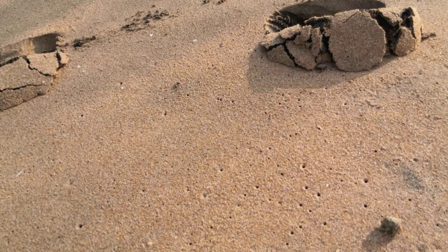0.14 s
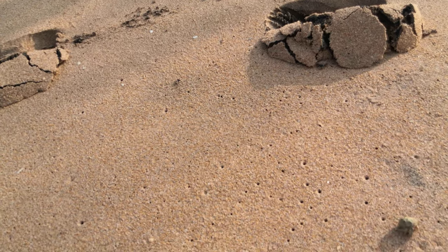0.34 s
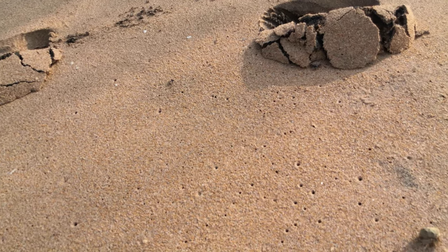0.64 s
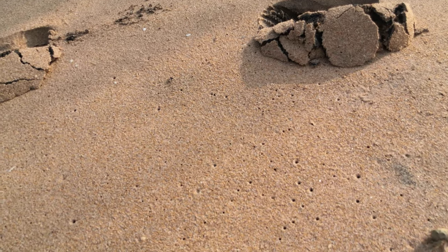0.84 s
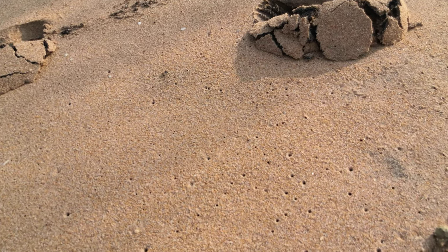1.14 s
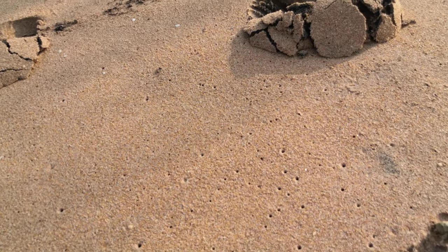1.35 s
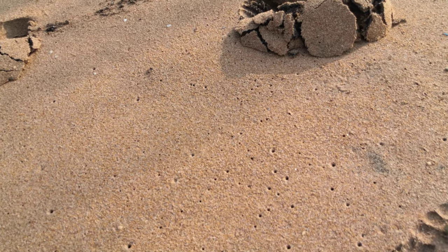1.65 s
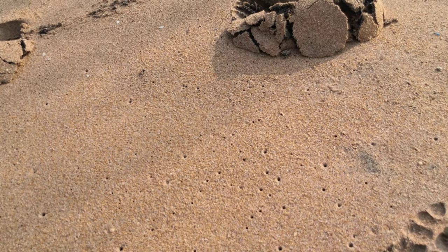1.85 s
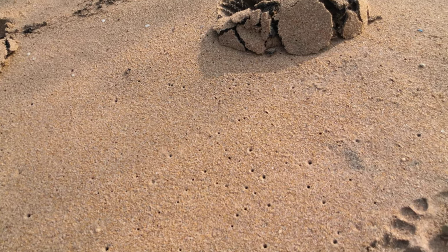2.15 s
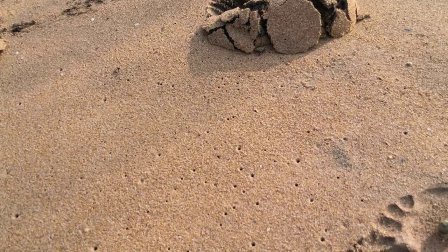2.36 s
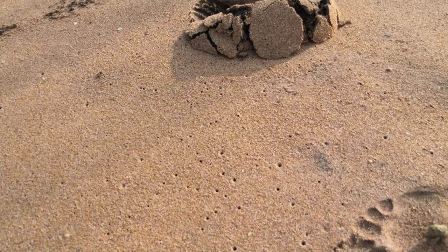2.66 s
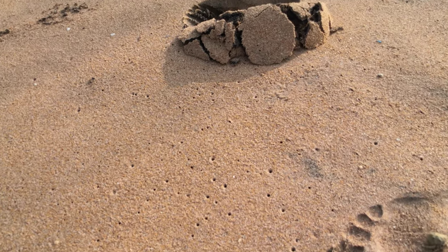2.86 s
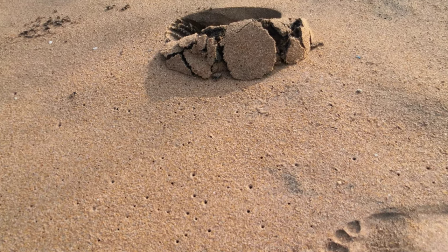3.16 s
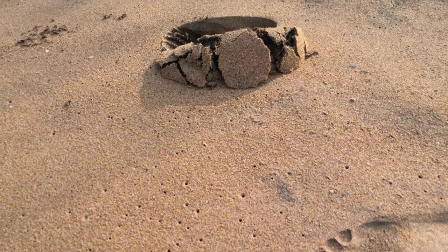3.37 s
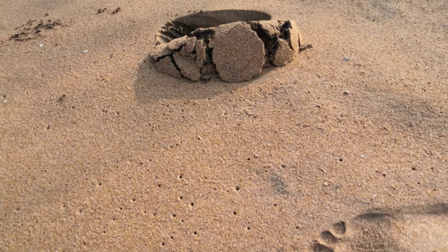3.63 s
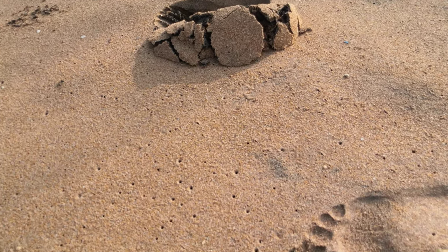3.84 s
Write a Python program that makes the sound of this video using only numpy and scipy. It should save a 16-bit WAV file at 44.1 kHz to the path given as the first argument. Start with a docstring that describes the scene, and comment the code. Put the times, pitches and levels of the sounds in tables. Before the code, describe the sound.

Sea waves wash steadily up a sandy beach, foam hissing over a low roar and wind rumble.

```python
"""Surf on a sandy beach, heard through the two microphone ports of a hand-held phone.
After a short silence the sound cuts in: far breakers roar over wind rumble, both shaped from noise bands,
and foam hisses and fizzes as a wave runs up the sand, from noise with thousands of short bubble rings.
Two small crests slap over near the start, and four more from 2.9 s on, as brief gains on the same bands.
"""
import sys
import numpy as np
from scipy import signal
from scipy.fft import rfft, irfft
from scipy.io import wavfile
from scipy.ndimage import uniform_filter1d

SR = 44100
rng = np.random.default_rng(int(sys.argv[2]) if len(sys.argv) > 2 else 0)


def store_wav(level_fs):
    """Save 16-bit WAV to argv[1]."""
    pcm = np.round(np.clip(np.atleast_2d(level_fs), -1, 1) * 32767)
    wavfile.write(sys.argv[1], SR, pcm.T.astype(np.int16))


N = 176400
T = np.arange(N) / SR  # seconds
HZ = np.fft.rfftfreq(N, 1 / SR) + 1e-3  # kept above zero for the logarithms
SPLIT_HZ = 577  # roar below, foam above
TILT_PIVOT_HZ = 2500  # brightening leaves the level here unchanged


def undb(db):
    """Decibel law: a level in dB becomes an amplitude gain."""
    return 10 ** (np.asarray(db) / 20)


def over_hz(table):
    """Logarithmic pitch scale: a table of frequency and value is interpolated by octaves."""
    table = np.array(table)
    return np.interp(np.log(HZ), np.log(table[:, 0]), table[:, 1])


def over_time(table, axis):
    """Piecewise-linear envelope: one column of a table is interpolated along time."""
    table = np.array(table)
    return np.interp(T, table[:, 0], table[:, axis])


def walk(rate):
    """Band-limited fluctuation: random levels, `rate` a second, smoothed twice to a spread near 1."""
    hold = int(SR / rate)
    steps = np.repeat(rng.standard_normal(N // hold + 1), hold)
    smooth = uniform_filter1d(uniform_filter1d(steps, hold), hold)
    return 1.3 * smooth[:N]


def rms(x):
    """Mean-square principle: the effective level of the centre of the stereo picture."""
    return np.sqrt(np.mean(x.mean(axis=0) ** 2))


BUBBLE_COUNT = 6000  # spread over the whole duration
BUBBLE_LOW_HZ, BUBBLE_HIGH_HZ = 899.4, 9930
BUBBLE_DB = -9  # level of all bubbles relative to the noise of the rush
BUBBLE_SCATTER_DB = 1.5  # mean excess of single bubbles over the weakest at their pitch
BUBBLE_CYCLES, BUBBLE_GLIDE = 14, .05  # cycles per unit of age, relative rise in pitch per unit of age


def bubbles():
    """Bubble resonance: foam bubbles burst at random times, each a short damped ring rising in pitch."""
    when, pitch, size = rng.random((BUBBLE_COUNT, 3)).T[:, :, None]
    hz = BUBBLE_LOW_HZ * (BUBBLE_HIGH_HZ / BUBBLE_LOW_HZ) ** pitch
    k = np.arange(1024)  # samples of one ring
    age = hz * k / SR / BUBBLE_CYCLES
    phase = 2 * np.pi * BUBBLE_CYCLES * age * (1 + BUBBLE_GLIDE * age / 2)
    ring = np.sin(phase) * age * np.exp(-2 * age)
    # higher bubbles ring louder; levels scatter exponentially in dB
    ring = ring * hz * undb(-BUBBLE_SCATTER_DB * np.log(1 - size))
    places = (when * N).astype(int) + k
    out = np.bincount(places.ravel() % N, ring.ravel(), N)
    return out / out.std() * undb(BUBBLE_DB)


# Colour of the sea through the phone. Each row: frequency in Hz, relative spectral density in dB per Hz.
SEA_COLOUR = [(15, -46), (25, -18.5), (64, -6), (118, -1.5), (172, 0.5), (271, -2), (404, -4.5),
              (588, -11.5), (900, -15), (1090, -18.5), (1350, -20), (1700, -15.5), (2200, -14), (2700, -17),
              (3260, -23), (3800, -24.5), (5720, -27), (6200, -29), (7280, -28), (7900, -27.5), (8400, -32),
              (8800, -31.5), (9500, -39.5), (10300, -45.5), (15000, -54)]
# Coherence of the two ports. Each row: frequency in Hz, likeness from 0 to 1.
PORT_LIKENESS = [(60, .995), (200, .96), (300, .86), (500, .58), (700, .42), (900, .18), (1100, .4),
                 (1700, .12), (2400, .4), (3000, .2), (4600, .3), (5500, .15), (6300, .3), (15000, .22)]
# Phase between the ports. Each row: frequency in Hz, lead of the left port in radians.
LEFT_LEAD = [(20, .02), (100, .2), (200, .5), (300, .9), (500, 1.9), (700, 3.1), (1250, 3.3), (1600, 6.3),
             (2000, 9.4), (2800, 9.8), (3600, 12.3), (5000, 14.3), (6000, 9.6), (7000, 13), (8000, 15.7),
             (9000, 18.6), (15000, 21)]
# Level difference of the ports. Each row: frequency in Hz, left minus right in dB.
LEFT_RIGHT_BALANCE = [(60, -0.5), (200, 0), (380, 1), (650, 6), (950, 3.5), (1400, 3.5), (2360, 3),
                      (4350, 2), (6200, 3.5), (8300, 3), (10000, -1.5), (15000, 0.5)]


def ports(a, b):
    """Partial coherence: two unrelated signals mix into left and right spectra, with phase lead and balance."""
    like = np.clip(over_hz(PORT_LIKENESS), 0, 1)
    same = np.sqrt((1 + like) / 2) * rfft(a)
    other = np.sqrt((1 - like) / 2) * rfft(b)
    # half of the lead and half of the balance go to each side
    turn = np.exp(.5j * over_hz(LEFT_LEAD))
    tilt = undb(over_hz(LEFT_RIGHT_BALANCE) / 2)
    left = (same + other) * turn * tilt
    right = (same - other) / turn / tilt
    return np.array([left, right]) * undb(over_hz(SEA_COLOUR))


def rushing_water():
    """Turbulent noise: white noise with bubbles, drawn twice and passed to the two ports as spectra."""
    first = rng.standard_normal(N) + bubbles()
    second = rng.standard_normal(N) + bubbles()
    return ports(first, second)


# Far breakers and wind. Each row: time in seconds, base roar level in dB, extra wind rumble in the bass in dB.
ROAR_COURSE = [(.37, -37, 2), (.6, -34, 0.5), (1.2, -33, -5.5), (1.8, -34, -4), (2.2, -35.5, -3),
               (2.6, -35, -1.5), (3.0, -33.5, -0.5), (3.36, -33, 4), (3.6, -33.5, -6), (4, -37.5, 12)]


def roar_levels(water):
    """Level normalisation: gain in dB that brings the low water to the roar course, and the extra rumble."""
    low_water = irfft(water * (HZ < SPLIT_HZ), N)
    gain_db = over_time(ROAR_COURSE, axis=1) - 20 * np.log10(rms(low_water))
    return gain_db, over_time(ROAR_COURSE, axis=2)


WIND_HZ, RUMBLE_DB = 99, 1.5  # where the rumble's dB gain is halved, random wander of the wind


def wind_rumble(extra_db, hz):
    """Low-frequency weighting: wind raises and wanders the bass, with an effect that fades up the scale."""
    return (extra_db + RUMBLE_DB * walk(7.5)) / (1 + (hz / WIND_HZ) ** 2)


# Foam on the sand. Each row: time in seconds, base foam level in dB, brightening in dB per octave.
FOAM_COURSE = [(.37, -43, -.5), (.45, -44, 0), (.6, -42.5, -1), (.8, -41.5, 0.2), (1, -40.5, 0),
               (1.2, -40.5, -.2), (1.32, -40, -0.8), (1.53, -40, 0.5), (1.7, -40, -0.3), (1.9, -40.5, 0.2),
               (2.15, -40, 0), (2.27, -39.5, 0.5), (2.36, -40, 0.5), (2.55, -38.5, -0.5),
               (2.68, -39.5, 0.2), (2.8, -39, 0.1), (3.2, -39, 0.75), (3.3, -39, 0.5), (3.5, -40, 0.5),
               (3.62, -39.5, 0.5), (3.78, -41, 0), (4, -38, 0.5)]


def foam_levels(water):
    """Level normalisation: gain in dB that brings the high water to the foam course, and its spectral tilt."""
    high_water = irfft(water * (HZ > SPLIT_HZ), N)
    gain_db = over_time(FOAM_COURSE, axis=1) - 20 * np.log10(rms(high_water))
    return gain_db, over_time(FOAM_COURSE, axis=2)


HISS_HZ, HISS_OCTAVES = 4900, .45  # centre, distance at which the change in dB falls to 1/e
# The hiss dulls and clears. Each row: time in seconds, change at the centre frequency in dB.
HISS_COURSE = [(.37, -2.5), (.55, 1), (1, -0.5), (1.5, 1), (2.05, 0), (2.18, -1.5), (2.28, -3), (2.36, -1),
               (2.7, 1.5), (3.2, .5), (3.75, -1), (4, -2.5)]


def hiss_change(hz):
    """Bell-shaped equalisation: the change of the hiss in dB is greatest near 5 kHz."""
    return over_time(HISS_COURSE, axis=1) * np.exp(-(np.log2(hz / HISS_HZ) / HISS_OCTAVES) ** 2)


SLAP_ATTACK_S, SLAP_RELEASE_S = .035, .04  # time constants of the amplitude
# Small crests slapping over. Each row: start of the hold in seconds, level in dB over the water before
# colouring, hold in seconds, pan left minus right in dB, brightening in dB per octave.
CRESTS = [(0.35, -2, 0.02, 3, 2.5), (0.54, -6, .03, 3, 4), (2.887, -0.5, 0.06, -0.5, 1),
          (3.01, -6, 0.06, -5, 3.5), (3.357, 0.5, 0.036, -0.5, 0.5), (3.914, -1, 0.039, 2, 2)]


def slaps():
    """Power addition: relative power of each crest in each channel, with exponential rise, hold and fall."""
    out = []
    for start, db, hold, pan_db, _ in CRESTS:
        rise = np.minimum((T - start) / SLAP_ATTACK_S, 0)
        fall = np.maximum(T - start - hold, 0) / SLAP_RELEASE_S
        channel_gain = undb(db + pan_db * np.array([[.5], [-.5]]))
        out.append((np.exp(rise - fall) * channel_gain) ** 2)
    return np.array(out)


# Colour of a crest relative to the sea. Each row: frequency in Hz, relative level in dB.
CREST_COLOUR = [(100, -5), (400, -5.5), (900, 4.5), (2200, -0.5), (4500, -2.5), (8000, -1), (12000, -4)]


def slap_gain(crests, hz):
    """Incoherent summation: crest powers, coloured and tilted for one band, add to the water's own power."""
    colour_hz, colour_db = np.array(CREST_COLOUR).T
    tilt_db = np.array(CRESTS)[:, -1] * np.log2(hz / TILT_PIVOT_HZ)
    crest_db = np.interp(np.log2(hz), np.log2(colour_hz), colour_db) + tilt_db
    return np.sqrt(1 + np.tensordot(undb(crest_db) ** 2, crests, axes=1))


SHARED_DB, FLICKER_DB = .1, .6  # wander common to neighbouring bands, flicker of each band alone


def sea():
    """Subband synthesis: half-octave bands of water follow roar or foam, wander together and flicker alone."""
    water = rushing_water()
    roar_db, rumble_db = roar_levels(water)
    foam_db, brightening = foam_levels(water)
    crests = slaps()
    shared = walk(6)
    out = 0
    for octave in np.arange(4, 14.5, .5):  # log2 of the band centre in Hz
        hz = 2 ** octave
        triangle = np.clip(1 - 2 * np.abs(np.log2(HZ) - octave), 0, 1)
        band = irfft(water * triangle, N)
        shared = .8 * shared + .6 * walk(6)  # mostly inherited from the band below
        foam_share = 1 / (1 + (SPLIT_HZ / hz) ** 4)
        bright_foam_db = foam_db + brightening * np.log2(hz / TILT_PIVOT_HZ)
        db = (1 - foam_share) * roar_db + foam_share * bright_foam_db
        db = db + SHARED_DB * shared + FLICKER_DB * walk(24.91)
        db = db + wind_rumble(rumble_db, hz) + hiss_change(hz)
        out = out + band * undb(db) * slap_gain(crests, hz)
    return out


START_S, FADE_S = .3606, .0005  # end of the silence, length of the ramp


def scene():
    """Onset gating: the sea is silent at first, then cuts in on a very short linear ramp."""
    return sea() * np.clip((T - START_S) / FADE_S, 0, 1)


TOP_HZ = 15000


def record(dry):
    """Low-pass filtering: the phone cuts the top with a steep elliptic filter."""
    lowpass = signal.ellip(10, .2, 70, TOP_HZ, fs=SR, output="sos")  # order, ripple dB, stopband dB
    return signal.sosfilt(lowpass, dry)


dry = scene()
out = record(dry)
store_wav(out)
```